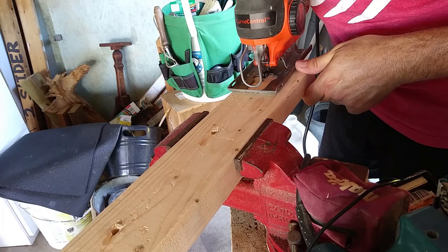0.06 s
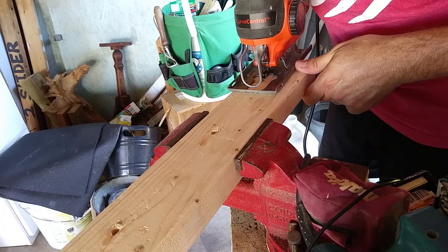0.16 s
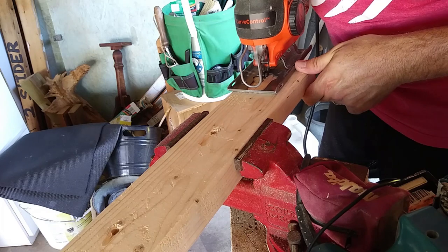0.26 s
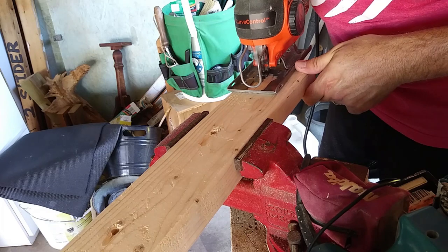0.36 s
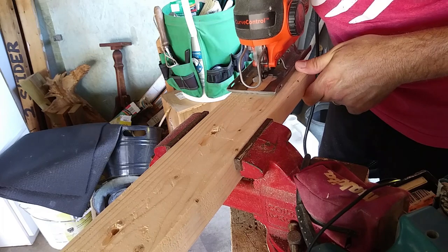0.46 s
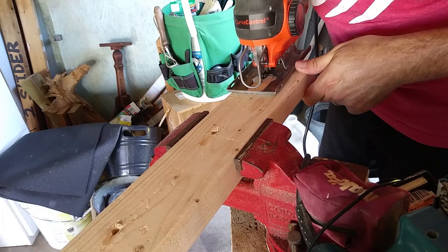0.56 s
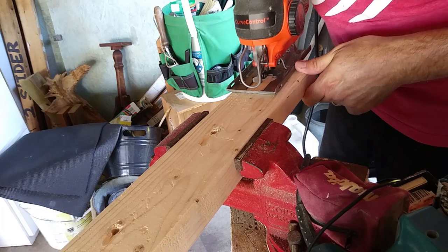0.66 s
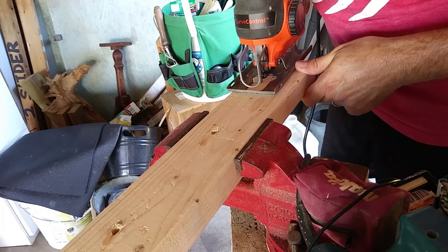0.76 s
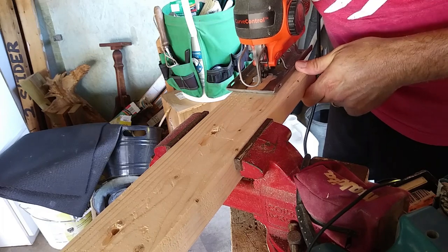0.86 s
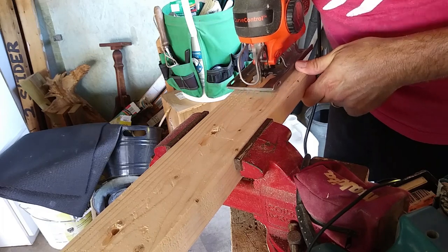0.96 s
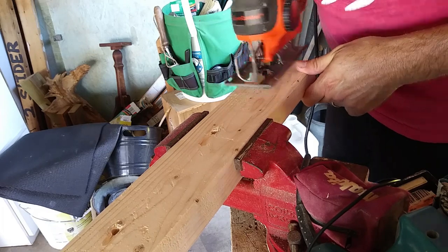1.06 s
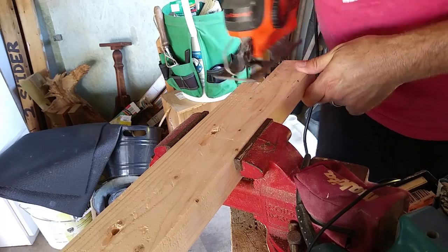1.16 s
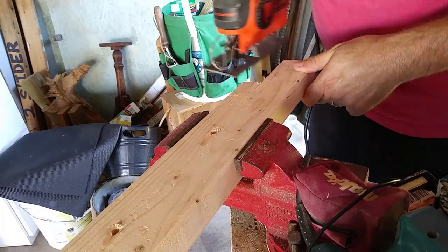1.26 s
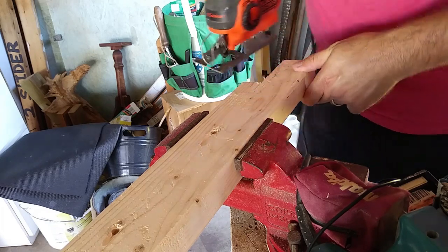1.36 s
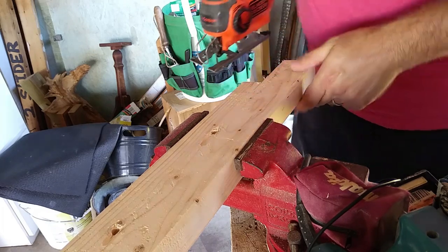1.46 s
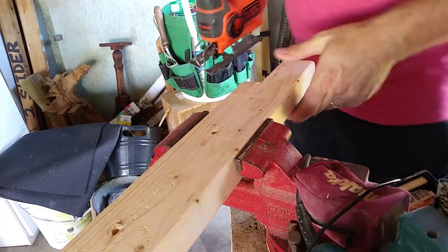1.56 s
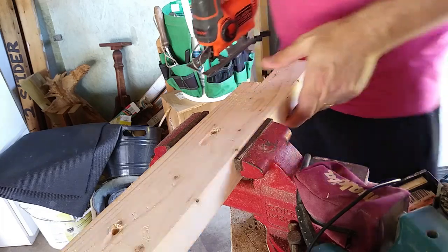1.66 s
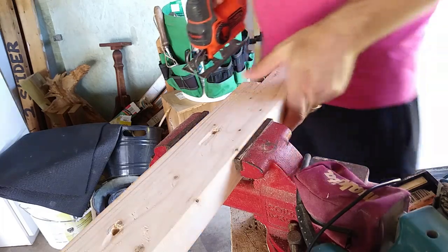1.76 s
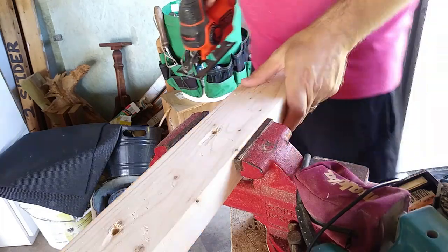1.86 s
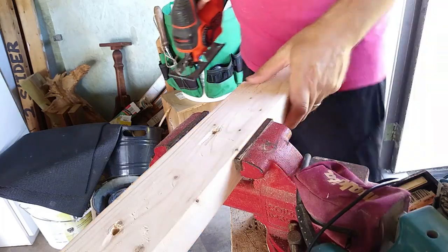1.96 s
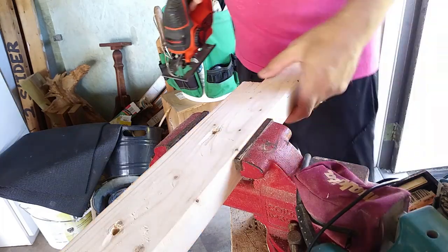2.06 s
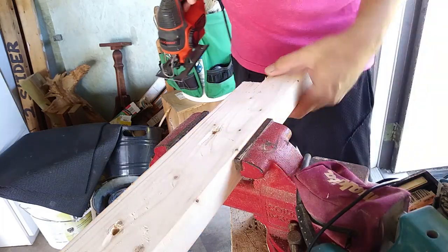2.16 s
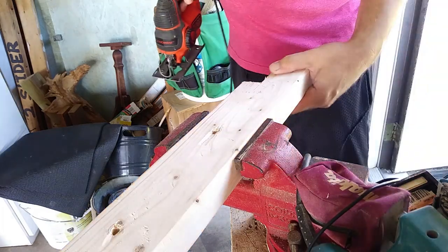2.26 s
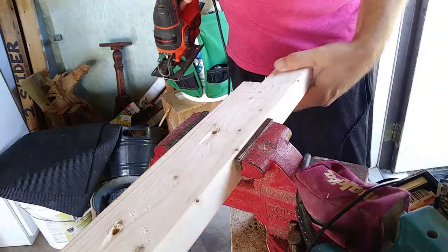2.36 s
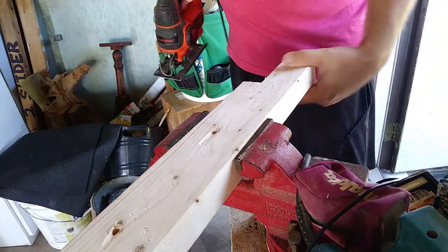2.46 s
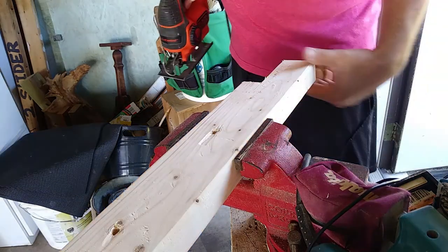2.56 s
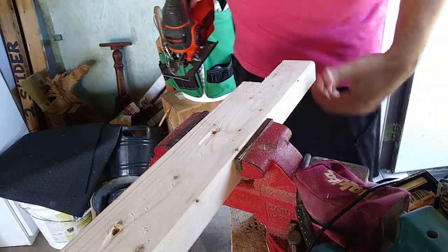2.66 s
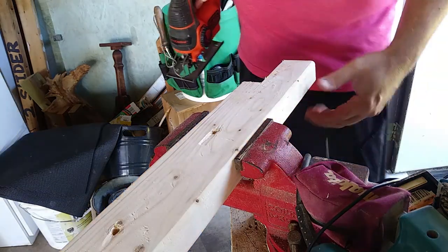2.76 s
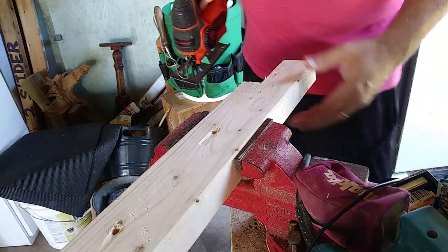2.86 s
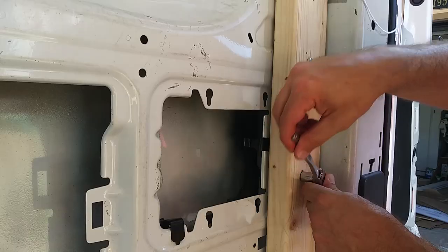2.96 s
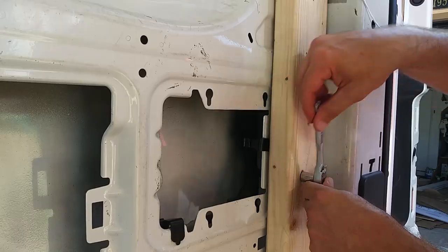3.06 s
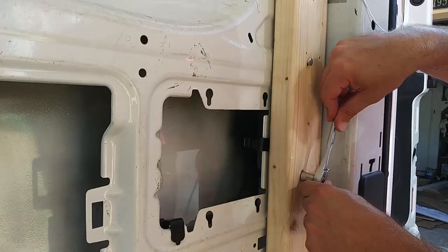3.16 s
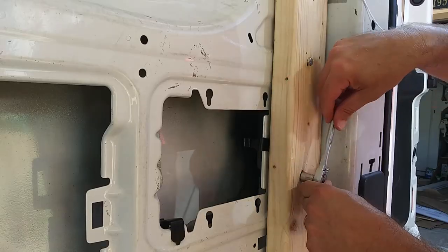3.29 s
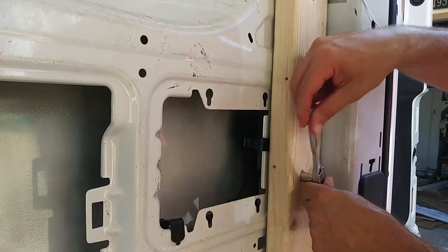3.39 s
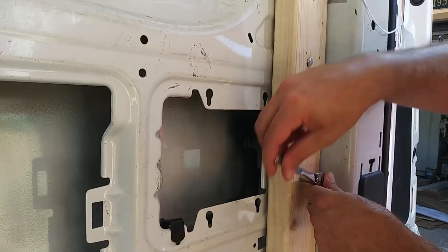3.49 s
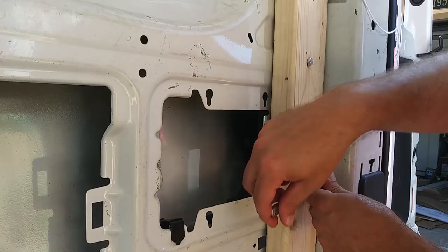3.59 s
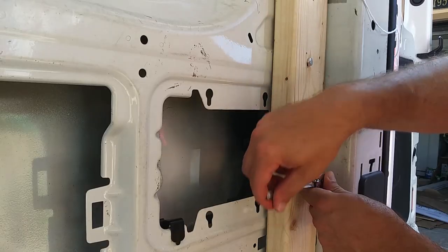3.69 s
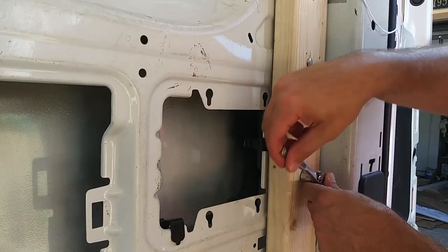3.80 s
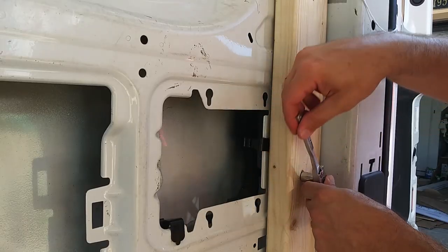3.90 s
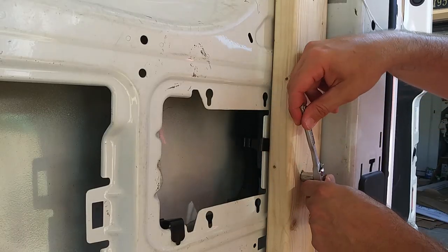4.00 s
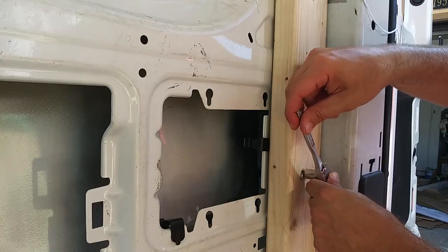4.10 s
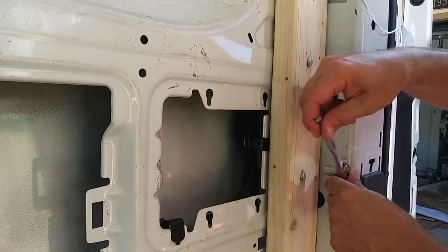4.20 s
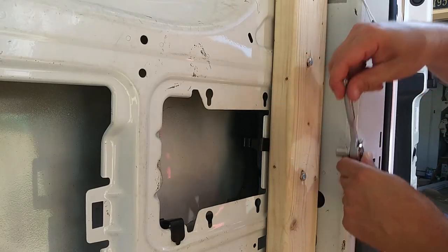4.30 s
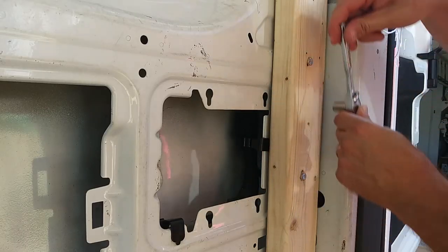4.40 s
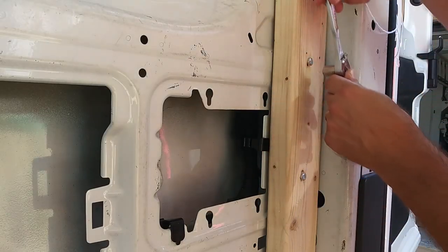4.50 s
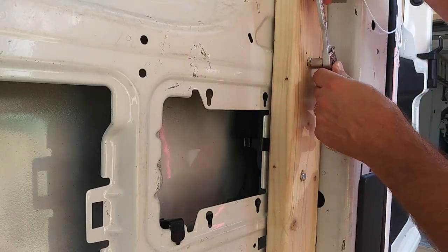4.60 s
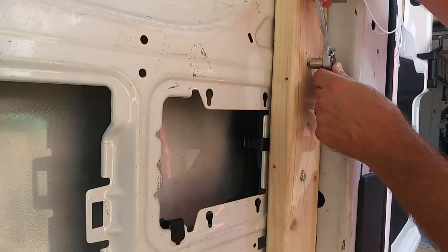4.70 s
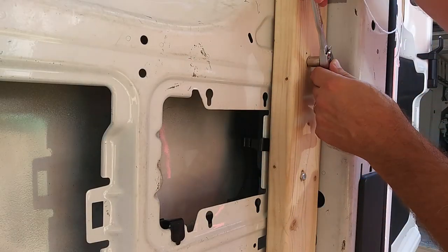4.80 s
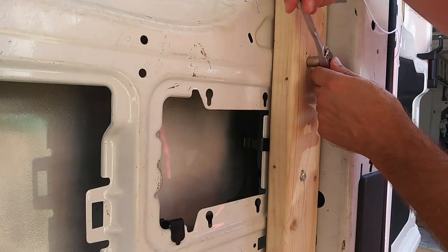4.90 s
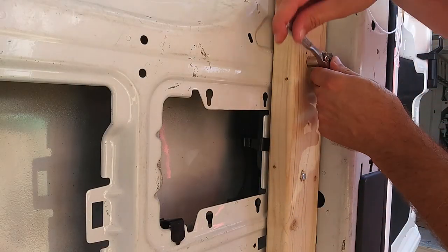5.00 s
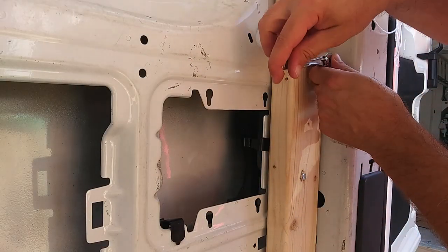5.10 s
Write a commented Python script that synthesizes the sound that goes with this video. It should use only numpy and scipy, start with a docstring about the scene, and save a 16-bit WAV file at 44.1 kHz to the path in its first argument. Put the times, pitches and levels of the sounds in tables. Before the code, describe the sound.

In a workshop, a jigsaw finishes cutting a wooden board, rattling and rasping over a motor whine. It winds down, its blade giving high squeaks that slow until it stops. Then, inside a van, a ratchet wrench drives a screw through timber: a quick run of clicks, several sharp knocks of the socket with a slight boom from the metal panel, and a few more clicks. Both tools sound close.

```python
"""Workshop, then a van. A jigsaw ends a cut in a clamped board: housing rattle, blade rasp, motor whine.
It coasts to a stop, the dry blade guide squeaking twice a stroke. In the van a ratchet wrench drives
a screw through a timber batten into the steel side: the pawl clicks on the back swings, the socket
knocks as it takes up the load, the panel booms. Faint hand rubs and still air lie underneath."""
import sys
import numpy as np
from scipy import signal
from scipy.fft import rfft, irfft
from scipy.io import wavfile
from scipy.ndimage import uniform_filter1d

SR = 44100
rng = np.random.default_rng(int(sys.argv[2]) if len(sys.argv) > 2 else 0)


def generate_wav(signal):
    """Clip the signal to [-1, 1] and save it as 16-bit WAV at the path in sys.argv[1]."""
    frames = np.transpose(np.atleast_2d(signal))
    scaled = np.clip(frames, -1, 1) * 32767
    pcm = np.round(scaled).astype(np.int16)
    wavfile.write(sys.argv[1], SR, pcm)


N = 226850
TIME_S = np.arange(N) / SR

# Levels in all tables are relative.
# powered saw, sagging under load: t/s, stroke rate/Hz
POWERED_RATE = [(0, 29.6), (.33, 28.2), (.5, 28.8)]
# running saw: t/s, housing rattle/dB, gear and blade rasp/dB
SAW_LEVELS = [(0, -19.5, -14.5), (.4, -19.5, -15.5), (.6, -17, -14.5), (.9, -20, -17), (1.3, -27, -19),
              (1.8, -34.5, -28), (2.17, -41.5, -36), (2.42, -53.5, -54.5), (2.66, -81, -77)]
# bright upstroke rasp; motor whine: t/s, level/dB
UPSTROKE_LEVELS = [(0, -31), (.3, -25), (.42, -33.5), (.8, -32.5), (2.3, -67.5)]
WHINE_LEVELS = [(0, -22), (.33, -24.5), (.5, -28), (.66, -49.5), (.76, -27), (.93, -27), (1.2, -39.5)]
# dry spots on the guide: crank past upstroke/turns, glide/oct, level/dB, loudest stroke rate/Hz
SQUEAK_SPOTS = [(0, 0.23, -17, 8.6), (.26, -0.66, -13, 13.8)]
# pawl drops: t/s, level/dB, ring f/Hz
PAWL_DROPS = [(3.389, -18.5, 4360), (3.4244, -14.5, 7700), (3.456, -14, 4070), (3.491, -12, 4250),
              (3.52, -11, 4400), (3.5486, -12.5, 4220), (3.58, -14.5, 5600), (3.615, -13, 5340),
              (3.6716, -13, 5420), (4.9884, -11.5, 5220), (5.0384, -11.5, 4970), (5.082, -13, 2380),
              (5.1354, -10, 4850)]
# back swings, socket still bearing on the screw: start t/s, jolt boost/dB
BACK_SWINGS = [(3.39, 10.5), (4.98, 1.5)]
# socket knocks: t/s, batten level/dB, steel level/dB
SOCKET_KNOCKS = [(3.154, -29.5, -55), (3.197, -37, -50.5), (3.349, -30.5, -37), (3.372, -27.5, -43.5),
                 (3.776, -20.5, -37.5), (3.842, -19, -28.5), (4.1, -24, -43), (4.134, -17, -23),
                 (4.139, -14.5, -24.5), (4.431, -44.5, -61), (4.636, -6.5, -13), (4.729, -19, -37),
                 (4.744, -13.5, -23.5), (4.757, -28, -23), (4.779, -14.5, -36), (4.867, -33, -47)]
# thin door panel flexing as the hand leans on the wrench: t/s, level/dB
PANEL_FLEXES = [(3.197, -51.5), (3.47, -37), (3.779, -40.5)]
# screw creaking in timber: t/s, f/Hz, level/dB
SCREW_CREAKS = [(4.75, 5030, -18), (4.78, 2250, -17)]
# hands on wood and tool: start t/s, length/s, level/dB
HAND_RUBS = [(2.42, 0.21, -59), (2.959, 0.048, -50.5), (3.092, 0.095, -53.5)]
# resonances of the parts: f/Hz, bandwidth/Hz, level/dB
HOUSING_MODES = [(523, 40, -0.5), (648, 76, -1), (847, 46, 3), (966, 63, 1.5), (1358, 90, 0.5),
                 (1680, 150, -4), (1923, 200, -1.5)]
GEAR_MODES = [(1400, 250, -2.5), (2816, 200, 4.5), (3270, 340, -2.5), (4840, 460, -7), (5315, 250, -1.5),
              (6570, 310, -2)]
WRENCH_MODES = [(2130, 720, -9.5), (3870, 185, -2), (4780, 400, -7.5), (6500, 800, 1), (6310, 1140, -1.5),
                (7300, 840, -9), (10530, 680, -21), (13900, 440, -32)]
BATTEN_MODES = [(780, 21.5, 8), (906, 56, 4.5), (1315, 25, -1), (1770, 37, -28)]
# saw noise spectra: f/Hz, level/dB
RATTLE_SPECTRUM = [(50, -62), (100, -49), (250, -25), (500, -0.5), (850, -2.5), (1150, 0), (2300, 6),
                   (3300, -12), (6000, -42)]
RASP_SPECTRUM = [(1200, -41.5), (2600, -2), (3500, -2), (4300, 3.5), (6000, 3), (7200, -2), (8800, -8.5),
                 (12000, -15.5), (16000, -32.5)]
UPSTROKE_SPECTRUM = [(3000, -12), (7000, -0.5), (10000, 0.5), (12500, -2), (14700, 0.5), (16000, -18)]
DRAUGHT_SPECTRUM = [(20, -6), (250, -9), (1500, -55.5)]
# spectra of the struck parts: f/Hz, level/dB
BATTEN_SPECTRUM = [(300, -30.5), (750, -12), (1500, 0), (3200, -9.5), (4500, -18), (9000, -55)]
SOCKET_SPECTRUM = [(1500, -23), (3000, 3), (5000, 5), (6300, 1), (8000, -9.5), (11000, -25), (16000, -40)]
PANEL_SPECTRUM = [(60, -43), (280, 2), (400, 7), (550, 13), (800, -0.5), (2500, -17)]
# background noise spectra: f/Hz, level/dB
RUB_SPECTRUM = [(80, -49.5), (400, -0.5), (1700, 1.5), (3800, -9), (6300, 1), (15000, -33)]
AIR_SPECTRUM = [(70, -31.5), (250, -13.5), (500, -7), (1200, -5.5), (3000, -14.5), (6500, -13.5),
                (9000, -22.5), (16000, -29)]


def saw_body(turns):
    """Loose parts excite housing and gears; the blade rasps sharply on each upstroke."""
    rattle_db, rasp_db = curves(SAW_LEVELS)
    upstroke_db, = curves(UPSTROKE_LEVELS)
    shake, knock = [clatter(turns, stroke_db=1, gear_db=-.3, grain_db=3.5) for _ in range(2)]
    grind, mesh = [clatter(turns, stroke_db=1.2, gear_db=1.2, grain_db=2.5) for _ in range(2)]
    housing = from_db(-2) * unit_rms(resonate(knock, HOUSING_MODES))
    gears = from_db(-2.5) * unit_rms(resonate(mesh, GEAR_MODES))
    rattle = from_db(rattle_db + .37) * unit_rms(colour(shake, RATTLE_SPECTRUM) + housing)
    rasp = from_db(rasp_db + 1.5) * unit_rms(colour(grind, RASP_SPECTRUM) + gears)
    bite = clatter(turns, stroke_db=5.5, gear_db=2, grain_db=3)
    return rattle + rasp + from_db(upstroke_db) * colour(bite, UPSTROKE_SPECTRUM)


def clatter(turns, stroke_db, gear_db, grain_db):
    """Gritty contact noise; surges once a turn with the upstroke, three times with gear load."""
    crank_rad = 2 * np.pi * turns
    stroke_surge_db = stroke_db * (np.cos(crank_rad) + np.cos(2 * crank_rad) / 2)
    surge_db = stroke_surge_db + gear_db * np.cos(3 * crank_rad + drift(10))
    return unit_rms(rng.standard_normal(N) * from_db(surge_db + grain_db * drift(700) + 1.2 * drift(90)))


def saw_stroke_hz(friction_hz_per_s=9.757, fan_tau_s=3.348, stop_s=2.572):
    """Stroke rate: held by the motor, then braked to rest by dry friction and fan drag."""
    powered_hz, = curves(POWERED_RATE)
    coasting_hz = friction_hz_per_s * fan_tau_s * np.expm1(np.maximum(stop_s - TIME_S, 0) / fan_tau_s)
    return np.minimum(powered_hz, coasting_hz)


def saw_motor(stroke_hz, turns, rotor_turns_per_stroke=9.46):
    """Three fluttering rotor orders sink as the motor slows; the fan adds a low draught."""
    whine_db, = curves(WHINE_LEVELS)
    rotor_rad = 2 * np.pi * rotor_turns_per_stroke * turns + drift(130) / 20
    gear = .48 * np.sin(3 * rotor_rad + .8 * drift(110))
    middle = np.sin(10 * rotor_rad) * np.interp(TIME_S, [.5, .65], [1, 0])
    high = np.sin(15 * rotor_rad)
    whine = sum(from_db(2.2 * drift(70)) * tone for tone in [gear, middle, high])
    whine *= from_db(-4.5 * np.cos(2 * np.pi * turns))  # ducks under upstroke load
    draught = colour(rng.standard_normal(N), DRAUGHT_SPECTRUM)
    draught *= from_db(-83.5 + 4 * drift(63)) * stroke_hz
    fade = np.interp(TIME_S, [1.15, 1.35], [1, 0])
    return (from_db(whine_db + 4) * whine + draught) * fade


def guide_squeaks(stroke_hz, turns, max_width_s=.01):
    """The blade slides through its dry guide; slower strokes give longer, purer squeaks."""
    out = np.zeros(N)
    t = np.arange(-2600, 2600) / SR
    for at_s, rate_hz, glide_oct, db in squeak_events(stroke_hz, turns):
        width_s = min((.07 if glide_oct > 0 else .057) / rate_hz, max_width_s)
        sag_oct = abs(glide_oct) / 2 - glide_oct / 2 * np.tanh(t / width_s / 2)
        top_hz = 8440 + 1500 / rate_hz
        jitter_hz = 350 * np.sqrt(rate_hz / 10) * drift(1500, len(t))
        phase = 2 * np.pi * np.cumsum(top_hz * 2 ** -sag_oct + jitter_hz) / SR
        # slipping contact smears part of the tone into a rasp
        slip = 2 * np.pi * np.cumsum(1000 * drift(4000, len(t))) / SR
        scrape = from_db(-5) * np.sin(phase + slip) + from_db(-24) * np.sin(2 * phase + slip / 2)
        # breaks loose faster than it settles
        swell = np.exp(-(t / np.where(t < 0, .83 * width_s, width_s)) ** 2 / 2)
        gain = from_db(db + 1.6 * drift(440, len(t)))
        add(out, at_s + t[0], (np.sin(phase) + scrape) * gain * swell)
    blade_ring = resonate(out, [(8200, 60, -10), (8880, 25, 7)])
    return out + blade_ring


def squeak_events(stroke_hz, turns, slowest_hz=1.5, fastest_hz=21.5, fall_db_per_oct2=2.6):
    """One squeak per pass of a dry spot: t/s, stroke rate/Hz, glide/oct, level/dB."""
    for spot_turns, glide_oct, db, loudest_hz in SQUEAK_SPOTS:
        for i in np.flatnonzero(np.diff(np.floor(turns - spot_turns)) > 0):
            if slowest_hz < stroke_hz[i] < fastest_hz:
                loss_db = fall_db_per_oct2 * np.log2(stroke_hz[i] / loudest_hz) ** 2
                yield TIME_S[i], stroke_hz[i], glide_oct, db - loss_db


def pawl_clicks(bearing_s=.046):
    """The pawl snaps over each tooth, rings the wrench head and jolts batten and panel."""
    steel, wood, panel = np.zeros((3, N))
    for at_s, db, ring_hz in PAWL_DROPS:
        snap = contact(rise_s=.0021, t60_s=.019)
        ring = resonate(snap, WRENCH_MODES + [(ring_hz, 220, 2)], scatter_db=4)
        click = ring + from_db(-17) * contact(rise_s=.0002, t60_s=.011)
        add(steel, at_s, from_db(db + 12.5) * click / np.linalg.norm(click))
        bearing_db = sum(boost_db * np.exp(-((at_s - start_s) / bearing_s) ** 2 / 2)
                         for start_s, boost_db in BACK_SWINGS)
        add(wood, at_s, from_db(bearing_db - 33.5) * contact(rise_s=.00094, t60_s=.064))
        add(panel, at_s, from_db(bearing_db - 53.5) * contact(rise_s=.016, t60_s=.3))
    spring_ring = resonate(steel, [(14550, 40, 6)])
    return steel + spring_ring + colour(wood, BATTEN_SPECTRUM) + colour(panel, PANEL_SPECTRUM)


def socket_knocks(boom_db=-35.5, boom_db_per_db=.68):
    """The socket takes up its play: steel clinks, the batten knocks, the panel booms and flexes."""
    steel, wood, panel = np.zeros((3, N))
    for at_s, wood_db, steel_db in SOCKET_KNOCKS:
        rise_s = .00035 * from_db(-wood_db)  # gentle contacts build slowly
        add(wood, at_s, from_db(wood_db - 10) * contact(rise_s, t60_s=.028))
        add(steel, at_s, from_db(steel_db + 3) * contact(rise_s, t60_s=.017))
        add(panel, at_s, from_db(boom_db + boom_db_per_db * wood_db) * contact(rise_s, t60_s=.23))
    for at_s, db in PANEL_FLEXES:
        add(panel, at_s, from_db(db) * contact(rise_s=.0047, t60_s=.18))
    batten = colour(wood, BATTEN_SPECTRUM) + from_db(9) * resonate(wood, BATTEN_MODES)
    return colour(steel, SOCKET_SPECTRUM) + batten + colour(panel, PANEL_SPECTRUM)


def screw_creaks(width_s=.00091):
    """The thread sticks and slips for a few milliseconds."""
    out = np.zeros(N)
    for at_s, hz, db in SCREW_CREAKS:
        swell = np.exp(-((TIME_S - at_s) / width_s) ** 2 / 2)
        out += from_db(db) * swell * np.sin(2 * np.pi * hz * TIME_S)
    return out


def van_thud(width_s=.00092):
    """The hardest knock shakes the whole van."""
    at_s = max(SOCKET_KNOCKS, key=lambda row: row[1])[0]
    return from_db(-39.5) * np.exp(-((TIME_S - at_s) / width_s) ** 2)


def hand_rubs():
    """Skin slides over wood and steel."""
    envelope = np.zeros(N)
    for start_s, length_s, db in HAND_RUBS:
        touching = 1.0 * ((TIME_S > start_s) & (TIME_S < start_s + length_s))
        envelope += from_db(db) * uniform_filter1d(touching, size=200)
    return colour(envelope * rng.standard_normal(N), RUB_SPECTRUM)


def still_air():
    """Faint, steady broadband hiss."""
    return from_db(-60.5) * colour(rng.standard_normal(N), AIR_SPECTRUM)


def room(x, wet_db, t60_s, treble_t60_s, treble_db, size=30000):
    """Direct sound plus a diffuse tail in two bands, each with its own decay."""
    t = np.arange(size) / SR
    low = butterworth(rng.standard_normal(size), 2500, "low")
    high = butterworth(rng.standard_normal(size), [2500, 9000], "band")
    tail = low * from_db(-60 * t / t60_s) + high * from_db(treble_db - 60 * t / treble_t60_s)
    tail *= 1 - np.exp(-t / .0015)
    tail /= np.sqrt(np.sum(from_db(-120 * t / t60_s)))
    return x + from_db(wet_db) * signal.fftconvolve(x, tail)[:N]


def contact(rise_s, t60_s, size=12000):
    """Chatter of two parts meeting: a burst that swells and dies, peak 1."""
    t = np.arange(size) / SR
    shape = (1 - np.exp(-t / rise_s)) * from_db(-60 * t / t60_s)
    return rng.choice([-1, 1], size) * shape / shape.max()


def resonate(x, modes, scatter_db=0):
    """Parallel resonators of alternating sign; modes: f/Hz, bandwidth/Hz, level/dB."""
    out = 0
    for k, (hz, width_hz, db) in enumerate(modes):
        r = np.exp(-np.pi * width_hz / SR)
        ring = signal.lfilter([1, 0, -1], [1, -2 * r * np.cos(2 * np.pi * hz / SR), r * r], x + 1e-18)
        gain = from_db(db + scatter_db * rng.standard_normal())
        out = out + (-1) ** k * (1 - r * r) / 2 * gain * ring
    return out


def colour(x, spectrum, size=4096):
    """Minimum-phase filter of the given spectrum; white noise keeps its power."""
    hz, db = np.transpose(spectrum)
    log_hz = np.log(np.fft.rfftfreq(size, 1 / SR) + 1)
    gain = unit_rms(from_db(np.interp(log_hz, np.log(hz), db)))
    cepstrum = irfft(np.log(gain))
    cepstrum[1:size // 2] *= 2
    cepstrum[size // 2 + 1:] = 0
    return signal.fftconvolve(x, irfft(np.exp(rfft(cepstrum))))[:len(x)]


def butterworth(x, hz, kind):
    """Butterworth filter, 12 dB/oct skirts."""
    return signal.sosfilt(signal.butter(2, hz, kind, fs=SR, output="sos"), x)


def drift(rate_hz, size=N):
    """Straight lines between unit Gaussian draws."""
    return np.interp(np.arange(size) * rate_hz / SR, np.arange(size), rng.standard_normal(size))


def curves(rows):
    """One per-sample curve for each column after t/s."""
    times_s, *columns = np.transpose(rows)
    return [np.interp(TIME_S, times_s, column) for column in columns]


def add(out, at_s, sound):
    """Mix a sound in at at_s."""
    i = int(np.clip(at_s * SR, 0, N - 1))
    out[i:i + len(sound)] += sound[:N - i]


def from_db(db):
    """Decibels to gain."""
    return 10 ** (np.asarray(db) / 20)


def unit_rms(x):
    """Scale to unit power."""
    return x / np.sqrt(np.mean(x ** 2) + 1e-20)


def scene():
    """Saw in the workshop, then wrench in the van; mono."""
    stroke_hz = saw_stroke_hz()
    turns = .315 + (np.cumsum(stroke_hz) - stroke_hz.sum()) / SR  # rests .315 turn past an upstroke
    squeaks = guide_squeaks(stroke_hz, turns)
    squeaks = room(squeaks, wet_db=-7.5, t60_s=.18, treble_t60_s=.36, treble_db=-4.5)
    body = saw_body(turns) * np.interp(TIME_S, [2.35, 2.68], [1, 0])
    saw = body + saw_motor(stroke_hz, turns) + squeaks
    clicks = room(pawl_clicks(), wet_db=-6.5, t60_s=.76, treble_t60_s=.16, treble_db=5.5)
    socket = room(socket_knocks() + screw_creaks(), wet_db=.5, t60_s=.2, treble_t60_s=.15, treble_db=-2)
    wrench = butterworth(clicks + socket, 170, "high")  # small parts radiate little bass
    return (saw + wrench + van_thud() + hand_rubs() + still_air())[None]


def record(dry):
    """Soft-clip the peaks, then low-pass steeply."""
    ceiling, cutoff_hz = .74, 16000
    rounded = dry / (1 + (dry / ceiling) ** 6) ** (1 / 6)
    return signal.sosfilt(signal.ellip(10, .1, 80, cutoff_hz, fs=SR, output="sos"), rounded)


dry = scene()
out = record(dry)
generate_wav(out)
```